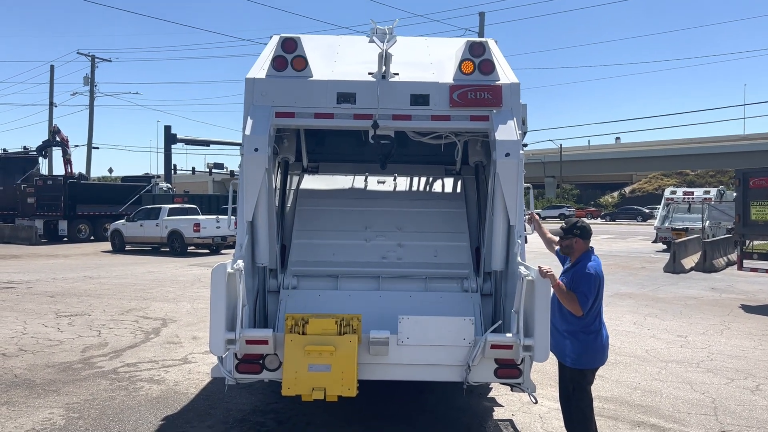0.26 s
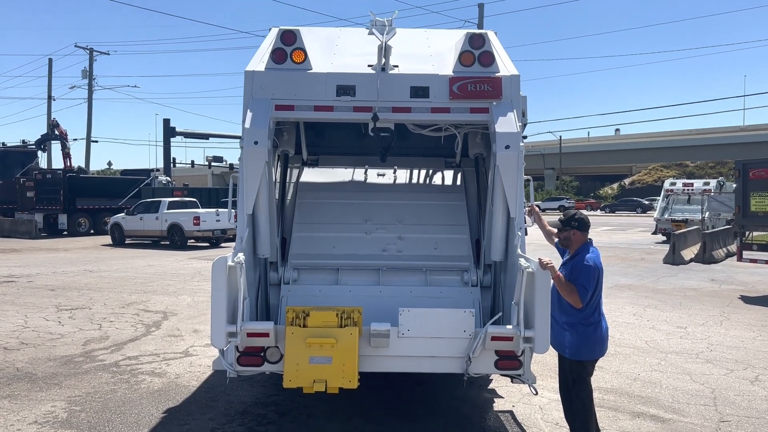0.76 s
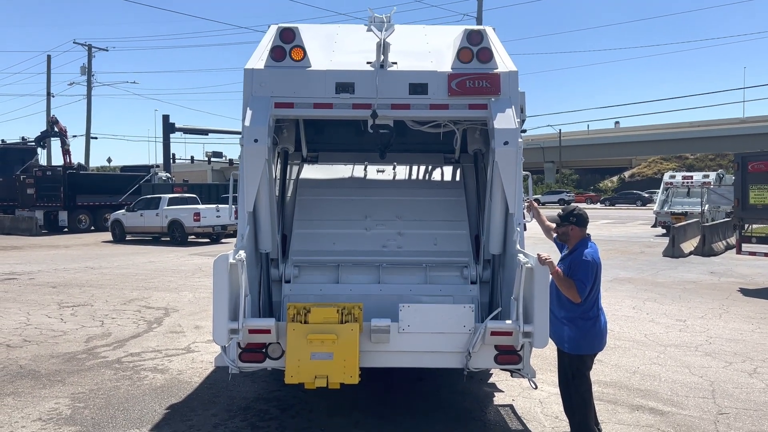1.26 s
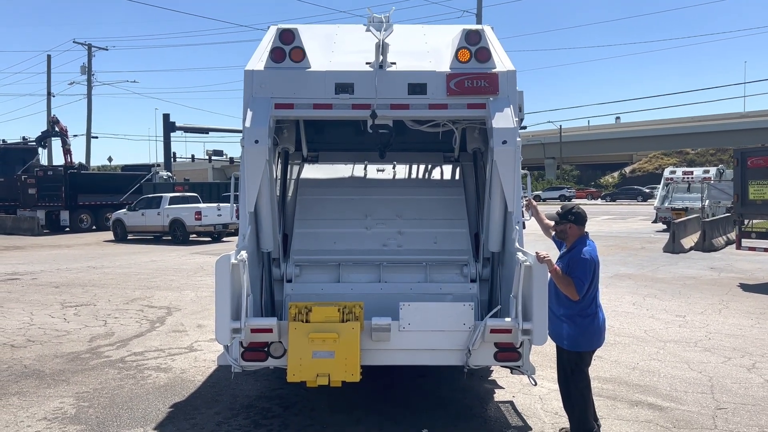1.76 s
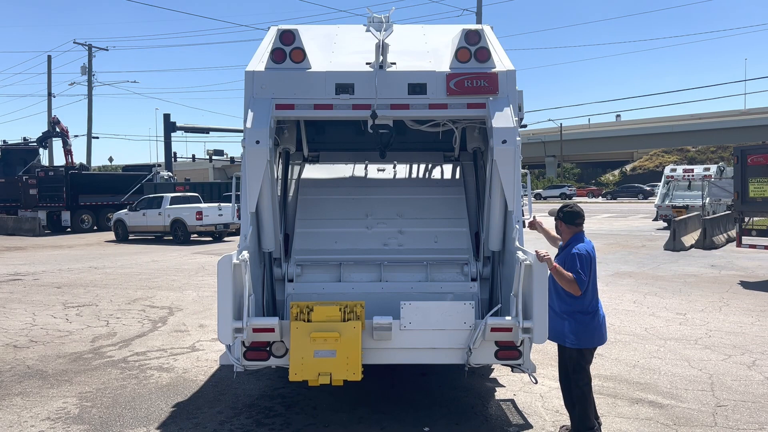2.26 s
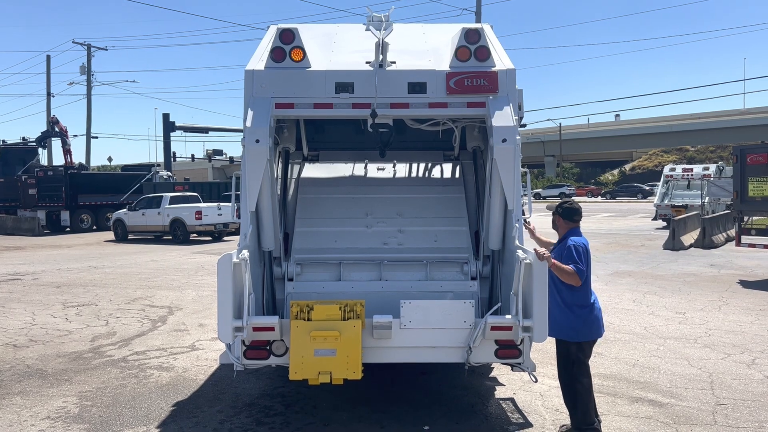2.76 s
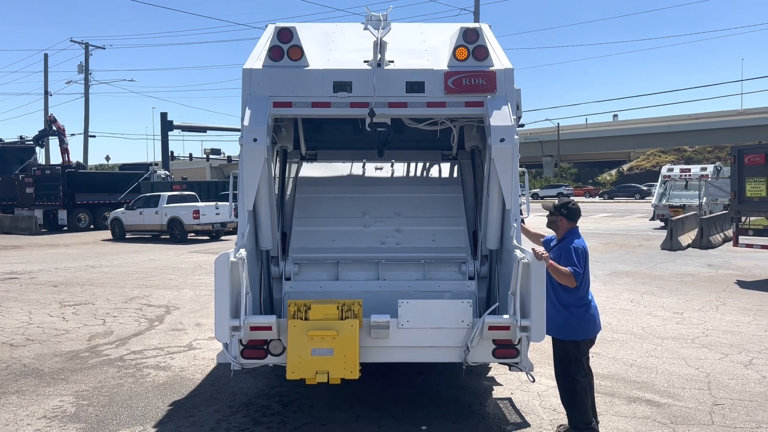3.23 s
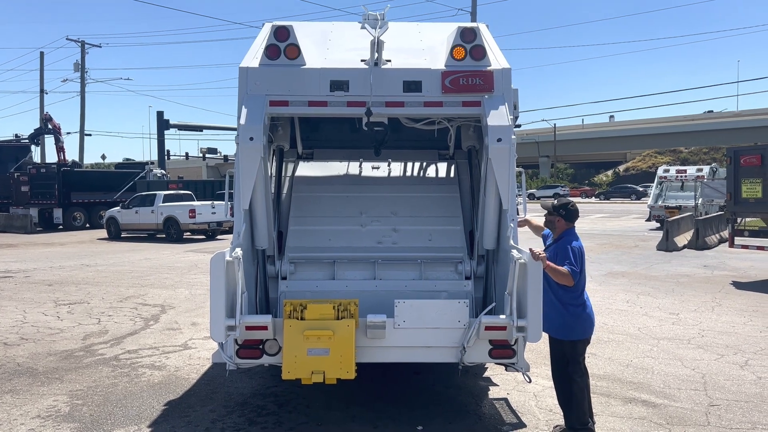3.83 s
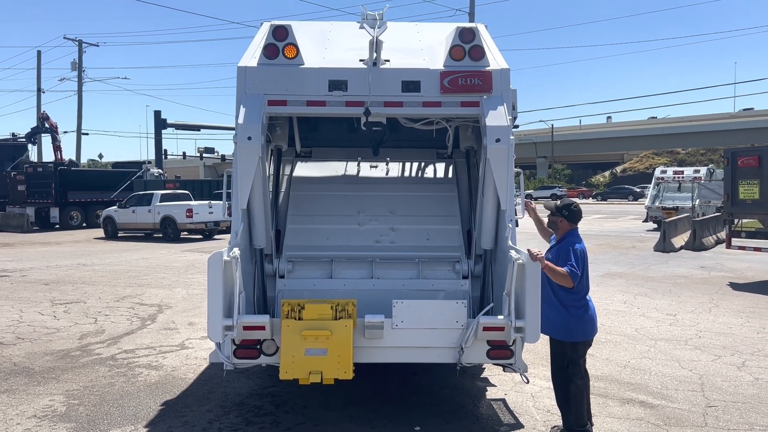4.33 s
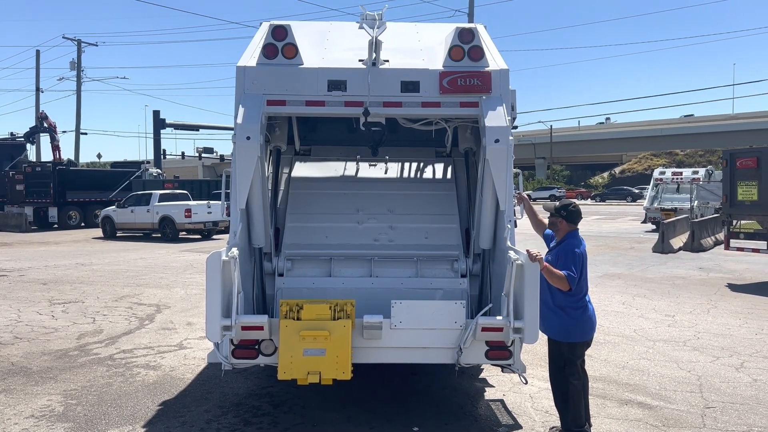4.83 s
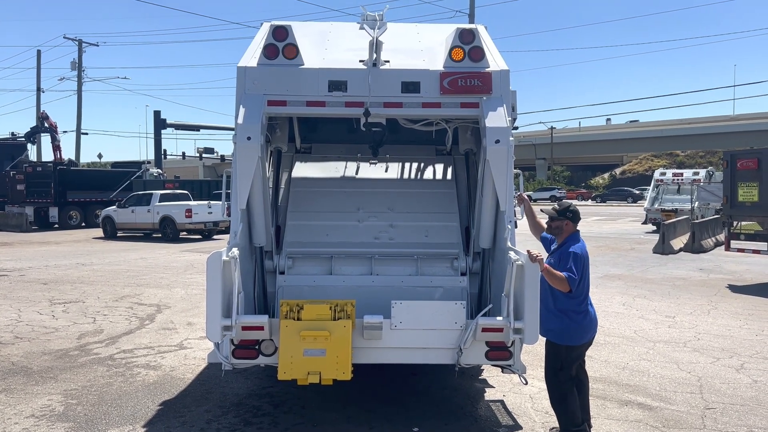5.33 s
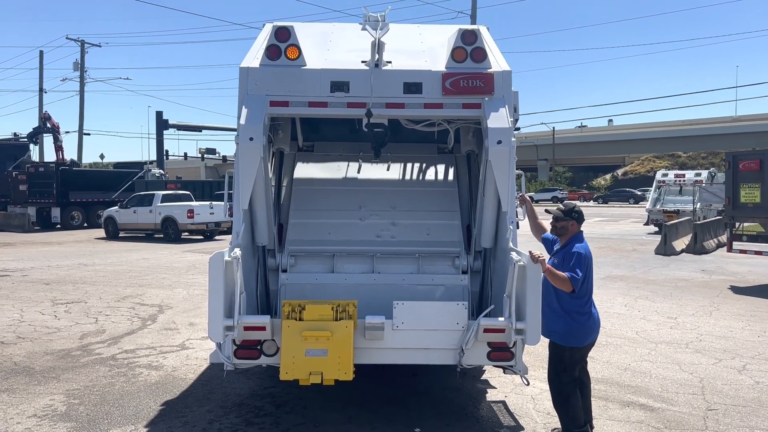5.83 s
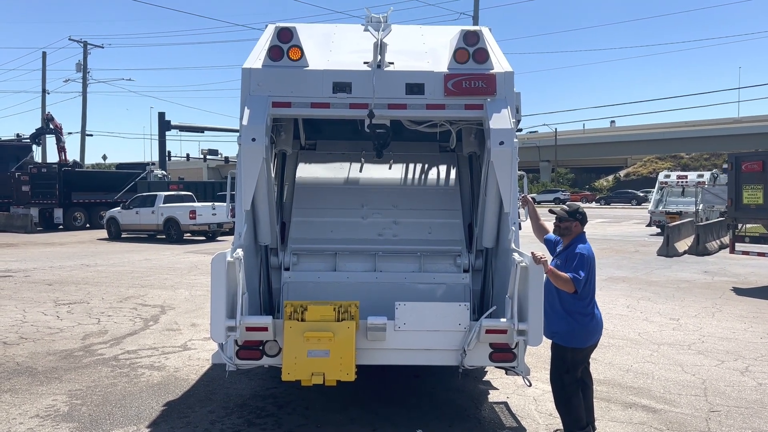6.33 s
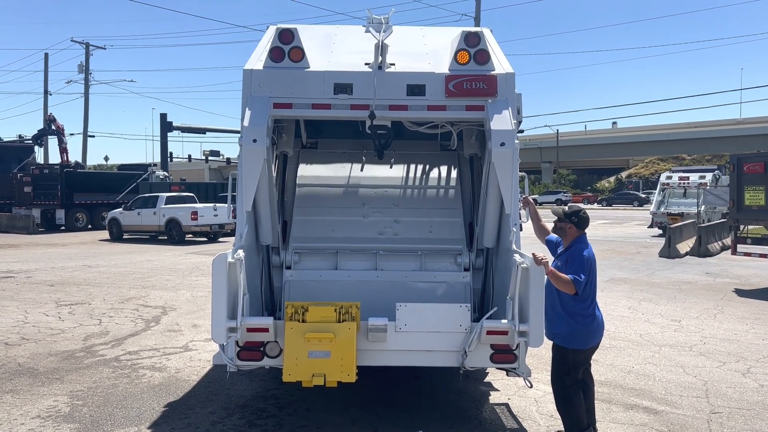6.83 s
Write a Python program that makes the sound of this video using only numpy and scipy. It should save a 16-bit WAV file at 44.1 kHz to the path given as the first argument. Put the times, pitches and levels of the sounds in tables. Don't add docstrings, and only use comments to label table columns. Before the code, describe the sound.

Behind a refuse truck in an open lot, a phone picks up steady diesel clatter, hydraulic pump whine and low body boom. Steel clatters as the packer blade starts, then a piercing squeal stutters along its rails. A heavy bang drums the tailgate while the engine sags to idle, then it revs up and holds steady.

```python
import sys
import numpy as np
from scipy import signal
from scipy.fft import rfft, irfft, next_fast_len
from scipy.io import wavfile
from scipy.ndimage import uniform_filter1d

SR = 44100
rng = np.random.default_rng(int(sys.argv[2]) if len(sys.argv) > 2 else 0)


def transcribe(signal):
    frames = np.atleast_2d(signal).T
    limited = np.clip(frames, -1, 1)
    pcm = np.round(limited * 32767).astype(np.int16)
    wavfile.write(sys.argv[1], SR, pcm)


def invert_db(level):
    return 10 ** (np.asarray(level, dtype=float) / 20)


N = 312669


def colour(x, table):
    hz, db = np.transpose(table)
    size = next_fast_len(len(x))
    gain = invert_db(np.interp(np.log(np.fft.rfftfreq(size, 1 / SR) + 1), np.log(hz + 1), db))
    return irfft(rfft(x, size) * gain, size)[:len(x)]


def unit(x):
    return x / np.sqrt(np.mean(x ** 2))


def walk(rate):
    hold = int(SR / rate)
    steps = np.repeat(rng.standard_normal(N // hold + 1), hold)
    return 1.11 * uniform_filter1d(uniform_filter1d(steps, hold), hold)[:N]


def curves(table):
    s, *columns = np.transpose(table)
    return [np.interp(np.arange(N) / SR, s, column) for column in columns]


def ring(x, modes):
    out = 0
    for hz, db, t60 in modes:
        r = np.exp(-np.log(1000) / (t60 * SR))
        poles = [1, -2 * r * np.cos(2 * np.pi * hz / SR), r * r]
        out = out + invert_db(db) * (1 - r) * signal.lfilter([1, 0, -1], poles, x)
    return out


def engine():
    # time_s, vane_rate_hz
    speed = [(0, 216.6), (1.45, 216.6), (1.75, 206.5), (2.0, 212), (2.3, 216.8), (2.8, 217.5), (3.1, 181),
             (3.4, 146), (3.75, 120), (4.1, 121), (4.3, 131), (4.5, 152), (4.8, 190), (5.0, 212),
             (5.15, 222), (5.45, 218.5), (5.8, 217), (7.09, 216.4)]
    # time_s, clatter_db, vane_tone_db
    load = [(0, -29.5, -25), (1.2, -30, -25), (1.42, -30.5, -24), (1.55, -28, -26), (1.85, -25.5, -33.5),
            (2.25, -27, -25.5), (2.7, -28, -26), (3.0, -33, -26), (3.35, -35.5, -26), (3.6, -35, -30),
            (3.95, -37.5, -23.5), (4.4, -32.5, -29.5), (4.9, -27.5, -26), (5.18, -29, -28),
            (5.28, -31, -29), (5.8, -30, -30.5), (6.4, -30, -26.5), (7.09, -29.5, -27)]
    shaft_orders = (2.5, 3.5, 4, 6, 7.5, 9, 12, 13.5, 14.5, 24, 26, 27, 28.5, 30, 31.5, 40.5, 45, 47.5, 52,
                    54, 56.5)
    shaft_order_db = (-1, -0.5, -14, 3.5, -2.5, -22, -9.5, -6, -11.5, -8.5, -4, 6, -25, -37, -10, -11.5,
                      -21, -14, -16, -4, -12.5)
    # pitch_hz, level_db (per Hz)
    roar_colour = [(59, -37), (100, 1), (166, -8.5), (219, 0), (242, -7), (268, -7), (472, -14.5),
                   (578, -10), (800, -15), (1120, -16), (1240, -16), (1480, -19), (1630, -19),
                   (1810, -23.5), (1940, -19.5), (2300, -22.5), (2600, -31.5), (3100, -47), (3450, -31.5),
                   (3900, -43), (4400, -57), (7040, -120)]
    # pitch_hz, level_db (per Hz)
    hiss_colour = [(1400, -18.5), (2400, -3), (2950, -7), (3600, -8), (4500, -12.5), (6100, -9.5),
                   (7600, -20.5), (8700, -16.5), (9600, -19.5), (11800, -25), (13000, -23), (15800, -63)]
    # pitch_hz, level_db (per Hz)
    boom_colour = [(12, -59), (20, -17), (44, -0.5), (64, 15), (81, 7), (103, -21), (130, -5.5), (170, -8),
                   (290, -120)]
    # pitch_hz, level_db
    habit_colour = [(220, -30), (450, -1), (3000, 1)]
    vanes = 10

    vane_hz, = curves(speed)
    roar_db, vane_db = curves(load)
    effort_db = roar_db + 30
    gear_db = -38 + 0.53 * effort_db + 0.56 * (vane_db + 27)

    stroke_start_s, stroke_end_s, oil_rise_s = 1.5, 3.34, 0.53
    travel_s = np.arange(N) / SR - stroke_start_s
    moving = travel_s < stroke_end_s - stroke_start_s
    oil = invert_db(-47.5) * np.clip(travel_s / oil_rise_s, 0, 1) * moving
    flow = np.hypot(invert_db(-46.5 + 0.96 * effort_db), oil)
    throb = np.hypot(invert_db(-29.5 + 0.059 * effort_db + 2 * walk(16)), shudders())

    turn = 2 * np.pi * np.cumsum(vane_hz) / SR / vanes
    sag = np.log2(vane_hz / vane_hz[0])
    rough = 1 + np.minimum(12 * np.abs(sag), 4.5)
    whine_db = vane_db - 0.5 * rough + 1.5 * rough * np.minimum(walk(16), 0.6)
    out = np.sqrt(2) * invert_db(whine_db) * np.sin(vanes * turn + 0.27 * rough * walk(25))
    octave_db = -40 + 0.2 * rough + 0.9 * rough * np.minimum(walk(18), 0.8)
    out += invert_db(octave_db) * np.sin(2 * vanes * turn + 0.35 * rough * walk(20))
    for order, db in zip(shaft_orders, shaft_order_db):
        fade_db = np.maximum(-2.5 * order * np.abs(sag), -order)
        level = invert_db(gear_db + db + fade_db + walk(18))
        out += level * np.sin(order * turn + rng.uniform(0, 2 * np.pi) + 0.3 * walk(9))

    firing = 3 * turn / (2 * np.pi)
    stroke = firing.astype(int)
    uneven_db = 1.45 * rng.standard_normal(N // 400)[stroke] + np.cos(2 * np.pi * stroke / 3)
    puff = invert_db(uneven_db) * np.exp(-(firing % 1) / 0.5)

    places = 4096
    place = (turn / (4 * np.pi) * places + 1.2 * walk(6)) % places
    habit = unit(np.interp(place, np.arange(places + 1), rng.standard_normal(places + 1)))
    clatter = colour(habit, habit_colour) + rng.standard_normal(N)
    roar = unit(colour((1 + 0.5 * puff) * clatter, roar_colour)) * invert_db(roar_db + 1.5 + 0.4 * walk(15))
    hiss = unit(colour((1 + 0.25 * puff) * rng.standard_normal(N), hiss_colour))
    hiss = hiss * flow * invert_db(2.5 + 0.5 * walk(15))

    boom = colour(rng.standard_normal(N), boom_colour)
    boom = unit(boom / np.sqrt(np.abs(uniform_filter1d(boom ** 2, SR // 25)) + 1e-12))
    pumping = 0.87 * invert_db(8.6 * sag) * np.sin(3 * turn + 0.17 * walk(7.3))
    boom = (boom + pumping) * throb * invert_db(-2.5)
    return out + roar + hiss + boom


def blows():
    # start_s, rattle_db, rattle_t60_s, tilt_db (per octave), thud_db
    hits = [(1.413, -21.5, 0.67, -4.5, -50), (1.478, -15, 0.3, -10, -25.5), (1.445, -13, 0.99, -12.5, -27),
            (1.511, -16.5, 0.73, -14, -29),
            (1.716, -53.5, 0.16, 1.5, -23.5)  , (1.789, -23, 0.65, -9.5, -35), (2.647, -18, 0.14, -6, -48),
            (2.664, -23.5, 0.44, -6, -45), (3.334, -27, 0.31, -2.5, -41), (3.349, -16.5, 0.24, -3.5, -32),
            (3.362, -20.5, 0.29, -3, -48), (3.376, -16.5, 0.95, -8.5, -31), (3.5, -16.5, 0.98, -18, -37),
            (3.749, -44, 0.25, -1, -22.5), (3.845, -23, 0.37, -9, -29), (4.12, -58, 0.56, -0.5, -30)]
    # pitch_hz, level_db, t60_s
    panel_modes = [(314, -18, 0.11), (500, -37, 0.66), (617, -10.5, 1.3), (752, -11.5, 0.86),
                   (780, -38, 5.0), (1007, -7, 0.13), (1230, -17, 0.47), (1290, -8, 0.2),
                   (1580, -0.5, 0.17), (1620, -51, 0.33), (2170, -14, 0.26), (2070, -7, 0.03),
                   (2620, -8.5, 0.026), (2990, -10.5, 0.019), (3278, -31, 0.53), (4307, -28, 0.51),
                   (4436, -40, 0.84), (5136, -29, 0.25)]
    # pitch_hz, level_db, t60_s
    hopper_modes = [(84, 0, 0.087)]
    longest_ring_s = 0.2
    damped_modes = np.minimum(panel_modes, [SR, SR, longest_ring_s])
    out, t = np.zeros(N + SR), np.arange(SR) / SR
    for s, db, t60, tilt_db, thud_db in hits:
        rise_s = 0.0021 + 0.00014 * tilt_db ** 2
        shake = (1 - np.exp(-t / rise_s)) * np.exp(-np.log(1000) * t / t60)
        grit = rng.standard_normal(SR) * invert_db(1.2 * np.repeat(rng.exponential(size=SR // 100), 100))
        rattle = colour(unit(grit) * shake, [
            (60, -40), (200, -0.5), (1800, 1.88 * tilt_db), (3600, 6.3 * tilt_db - 3),
            (9000, 6 * tilt_db - 2.5), (15000, 7 * tilt_db - 21)])
        steel = 2.56 * rattle + invert_db(17.5) * ring(rattle, damped_modes)
        thud = ring(rng.standard_normal(SR) * shake, hopper_modes)
        i = int(s * SR)
        out[i:i + SR] += invert_db(db + 10) * steel + invert_db(thud_db + 9) * thud / np.abs(thud).max()
    return out[:N]


def chirps():
    # start_s, end_s, pitch_hz, width_hz,
    # level_db
    passing_bands = [(1.432, 1.452, 3350, 450, -33), (1.45, 1.5, 3450, 200, -41), (1.435, 1.48, 4700, 900, -36),
                     (1.415, 1.58, 1000, 1200, -29), (1.52, 1.55, 2900, 1200, -37), (1.62, 2.0, 138, 40, -28),
                     (2.4, 3.0, 135, 50, -33), (3.385, 3.42, 1300, 900, -25), (1.585, 1.615, 6030, 150, -35),
                     (1.615, 1.65, 6000, 150, -45), (1.7, 1.8, 6000, 90, -48), (1.95, 2.22, 5430, 40, -45),
                     (2.22, 2.47, 5450, 45, -43.5), (2.2, 2.45, 6000, 60, -50), (3.1, 3.3, 6000, 50, -50),
                     (2.05, 2.25, 5000, 40, -52), (2.44, 2.8, 5010, 50, -50), (2.95, 3.3, 5000, 40, -53),
                     (2.96, 3.25, 5420, 25, -48), (3.14, 3.335, 5430, 30, -45), (3.02, 3.2, 3350, 25, -45.5),
                     (3.2, 3.34, 3360, 35, -48), (2.935, 3.01, 3830, 70, -47), (3.03, 3.3, 3820, 40, -48),
                     (2.05, 2.45, 3850, 80, -52), (3.335, 3.365, 7150, 200, -42), (3.345, 3.39, 1730, 150, -24),
                     (3.375, 3.425, 1600, 120, -26), (3.42, 3.47, 1600, 90, -30), (3.35, 3.382, 2900, 800, -27),
                     (3.385, 3.42, 2100, 500, -29), (3.35, 3.385, 4600, 300, -36), (4.125, 4.25, 6000, 1200, -54),
                     (4.13, 4.26, 4500, 250, -56), (4.4, 5.2, 9000, 2500, -60), (4.42, 5.2, 11800, 1500, -68),
                     (3.45, 3.95, 500, 400, -40),
                     (2.4, 3.0, 135, 50, -33), (3.385, 3.42, 1300, 900, -25), (3.65, 4.2, 178, 30, -38),
               (3.8, 4.06, 242, 25, -33), (3.6, 3.88, 290, 30, -35), (3.4, 3.65, 640, 50, -37),
               (3.65, 4.0, 580, 50, -42), (2.648, 2.68, 1500, 1400, -27), (2.68, 2.84, 590, 50, -33),
               (1.44, 1.6, 310, 90, -27), (2.82, 3.32, 375, 70, -35), (4.55, 5.2, 575, 60, -39)]
    out, flutter = np.zeros(N), invert_db(2.5 * walk(40))
    for start, end, hz, width_hz, db in passing_bands:
        i, size = int(start * SR), int((end - start) * SR)
        mode = [(hz, 0, np.log(1000) / (np.pi * width_hz))]
        song = ring(ring(rng.standard_normal(SR), mode), mode)
        song = unit(song[-size:] * flutter[i:i + size])
        out[i:i + size] += invert_db(db) * song * signal.windows.tukey(size, 0.4)
    return out


def thumps(table):
    out, late = np.zeros(N + SR), np.arange(SR) / SR
    for s, db, hz, t60 in table:
        i = int(s * SR)
        envelope = invert_db(db - 60 * late / t60) * (1 - np.exp(-late * hz))
        out[i:i + SR] += envelope * np.sin(2 * np.pi * hz * late)
    return out[:N]


def shudders():
    # start_s, level_db, t60_s
    jolts = [
        (1.47, -17, 1.5),
        (1.75, -17, 1.7),
        (2.22, -23, 2.2),
        (3.357, -18, 0.38),
        (3.489, -13, 0.63),
        (3.56, -22, .3),
        (4.5, -18, 0.85),
        (4.82, -18, 1.55),
        (6.33, -21, 0.62),
    ]
    rise_s = 0.03
    starts, db, t60 = np.transpose(jolts)[:, :, None]
    late = np.maximum(np.arange(N) / SR - starts, 0)
    swells = invert_db(db - 60 * late / t60) * (1 - np.exp(-late / rise_s))
    return np.sqrt(np.sum(swells ** 2, axis=0))


def squeal():
    # start_s, level_db, pitch_hz, left_lead_radians
    grips = [(1.588, -31.5, 6750, 1), (1.638, -33, 6700, 2.5), (1.811, -20, 6668, 0.64),
             (1.906, -23, 6640, 3.6), (1.99, -17.5, 6688, 0.7), (2.255, -18.5, 6697, 1.2),
             (2.279, -21, 6702, 4.1), (2.3, -22.5, 6690, 3.1), (2.325, -20, 6700, 1.7),
             (2.36, -19, 6690, 1.7), (2.42, -18.5, 6678, 0.64), (2.858, -33, 6640, 1.6),
             (2.938, -15.5, 6680, 1.1), (2.968, -20.5, 6700, 1.5), (2.995, -21.5, 6720, 2.6),
             (3.03, -25, 6700, 2.7), (3.055, -21, 6705, 2.4), (3.08, -22, 6705, 2.7),
             (3.11, -21, 6710, 2.43), (3.135, -26, 6705, 2.85), (3.155, -18.5, 6700, 1.4),
             (3.19, -17.5, 6698, 1.3), (3.286, -27.5, 6710, 7.2), (3.332, -19, 6770, 1.5),
             (3.365, -42, 6690, 1)]
    slew_s, ring_out_db_per_s = 0.026, 60
    rail_hz, octave_lead = 6680, 1.1
    t = np.arange(N) / SR
    starts, *columns = np.transpose(grips)
    grip = np.clip(np.searchsorted(starts, t) - 1, 0, None)
    db, hz, lead = (uniform_filter1d(column[grip], int(slew_s * SR)) for column in columns)
    db = db - ring_out_db_per_s * np.maximum(t - starts[-1], 0)
    lead = lead + 0.3 * walk(20)
    pan_db = 2.5 * walk(18) - 4 * np.sin(lead - 0.7)
    stutter = 1 + 0.35 * np.clip(-24 - db, 0, 12)
    gain = np.sqrt(2) * invert_db(db + stutter * walk(30.14)) * (t > starts[0])
    hz = uniform_filter1d(hz, SR // 20)
    phase = 2 * np.pi * np.cumsum(hz + 2 * walk(9) + 1.5 * stutter * walk(70)) / SR
    skirt = invert_db(-31) * (walk(800) + 1j * walk(600)) + invert_db(-41) * (walk(2200) + 1j * walk(2000))

    octave = invert_db(-21.5 + 0.38 * np.clip(hz - rail_hz, 0, 18)) * gain ** 0.55
    octave = octave * (t > starts[2]) * (t < starts[-1] - 0.013)
    wobble = 0.2 * walk(150)

    shared = unit(colour(rng.standard_normal(N), [
        (7800, -2.5), (8600, -4.5), (12500, -22), (13300, -22), (15300, -26)]))
    scrape_gain = invert_db(-38.5) * np.abs(uniform_filter1d(gain, SR // 10)) ** 0.33
    out = []
    for side in (1, -1):
        tone = np.imag((1 + skirt) * np.exp(1j * (phase + side * lead / 2))) * gain
        own = unit(colour(rng.standard_normal(N), [
            (6000, -51), (7800, -5), (8500, -6), (12500, -3.5), (13500, -32)]))
        overtone = octave * np.sin(2 * phase + wobble - side * octave_lead)
        out.append(tone * invert_db(side * pan_db / 2) + overtone + scrape_gain * (own + shared))
    return np.array(out)


def masked(heard):
    # low_hz, high_hz, squeal_threshold_db, past_squeal_threshold_db (under its peak)
    dropped_bands = [(5750, 6300, -21.5, -.35), (7000, 7550, -28, -40), (7550, 8000, -21.3, -40),
                     (8000, 8900, -21, -.55), (8900, 9900, -21, -.3)]
    frame, memory_frames, scatter_db = 1024, 24, 1.2
    size = next_fast_len(N)
    hz, mid = np.fft.rfftfreq(size, 1 / SR), rfft(heard.mean(axis=0), size)

    def band(low, high):
        return irfft(mid * (hz > low) * (hz < high), size)[:N]

    power = np.abs(uniform_filter1d(band(6400, 7000) ** 2, 2 * frame))[::frame]
    tone_db = 10 * np.log10(power + 1e-12)
    count = len(tone_db)
    whim = rng.standard_normal(count)
    past_db = np.convolve(tone_db, np.ones(memory_frames) / memory_frames)[memory_frames:count]
    past_db = np.pad(past_db - past_db.max(), (memory_frames, 0), mode="edge")
    for low, high, over_db, past_over_db in dropped_bands:
        chance = scatter_db * (whim + 0.5 * rng.standard_normal(count))
        lost = 1.0 * (tone_db + chance > over_db) * (past_db + chance / 3 > past_over_db)
        lost = uniform_filter1d(np.repeat(lost, frame), frame // 2)[:N]
        heard = heard - lost * band(low, high)
    return heard


def scene():
    # start_s, peak_db, pitch_hz, t60_s
    cracks = [(1.4155, -13, 1300, .012), (1.4255, -32, 1960, 0.016), (1.434, -31, 3300, 0.012),
              (1.51, -4, 910, .015), (1.567, -12, 1190, 0.018), (2.651, -15, 1270, .015),
              (2.66, -22, 2100, .02), (2.668, -5, 1090, .012), (3.337, -21, 1780, .015),
              (3.353, -9, 1790, 0.011), (3.349, -15, 2780, 0.0089), (3.356, -10, 1890, 0.0091),
              (3.366, -15, 1920, .015), (3.38, -8, 1320, .015), (3.393, -20, 1530, 0.013)]
    # start_s, peak_db, pitch_hz, t60_s
    tailgate = [
        (3.373, -3.5, 81.5, .45),
        (3.375, -19, 240, .35),
        (3.4, -18, 160, .9),
        (3.48, -12, 85, .9),
    ]
    # pitch_hz, side_minus_mid_db
    scatter_colour = [(60, -20), (110, -18.5), (200, -26.5), (380, -14.5), (700, -8), (1290, -1.5),
                      (2380, -4), (4400, -2), (8120, -2.5), (15000, -1)]
    truck = engine() + blows() + chirps() + thumps(tailgate) + thumps(cracks)
    tail_s = np.arange(SR // 3) / SR
    scatter = rng.standard_normal(len(tail_s)) * np.exp(-tail_s / 0.06)
    smeared = signal.fftconvolve(truck, scatter / np.linalg.norm(scatter))[:N]
    side = colour(smeared, scatter_colour)
    side += 1.2 * colour(np.gradient(truck), [(1200, 0), (4000, -9), (9000, -6)])
    side += colour(truck, [(1500, -56), (2200, -20), (3500, -5), (5000, -50)])
    return truck + np.array([side, -side]) + squeal()


def low_pass(x):
    return signal.sosfilt(signal.butter(12, 15920, fs=SR, output="sos"), x)


def record(dry):
    # pitch_hz, gain_db
    port_colour = [(22, -16), (42, -0.5), (9300, -0.5), (9750, -5.5), (9900, -34), (10750, -34), (11000, 0),
                   (13000, -4), (13200, -13), (13600, -13), (13900, -34), (14500, -30), (14800, 6)]
    heard = np.array([colour(channel, port_colour) for channel in dry])
    rounded = np.tanh(0.5 * heard) / 0.5
    return low_pass(masked(rounded))


dry = scene()
out = record(dry)
transcribe(out)
```